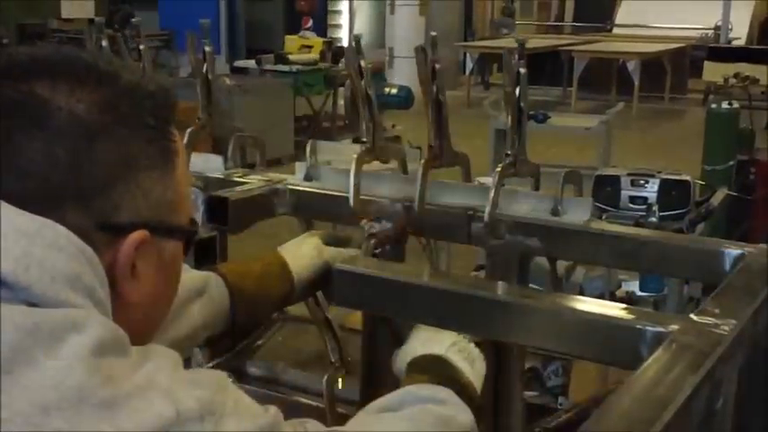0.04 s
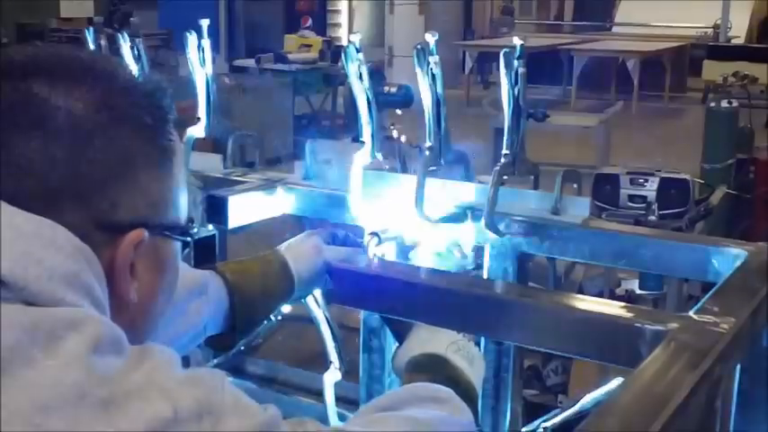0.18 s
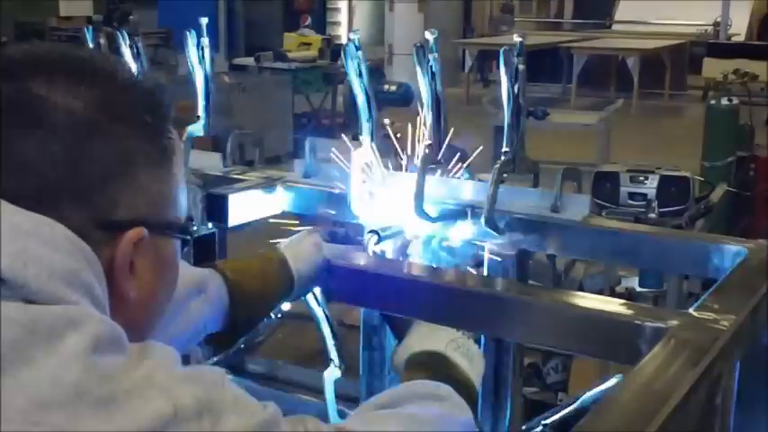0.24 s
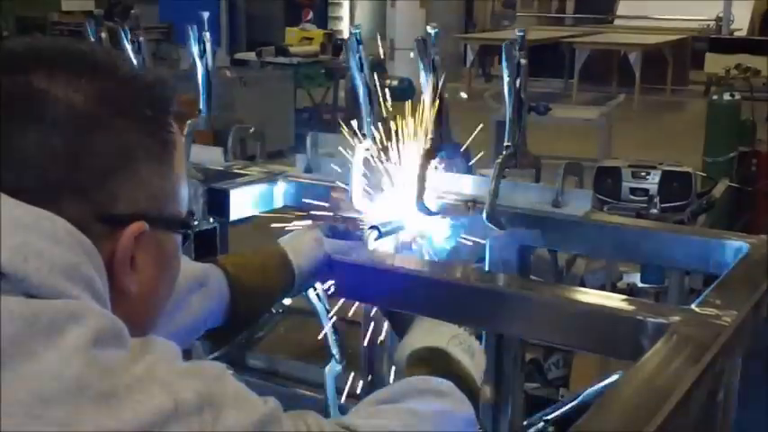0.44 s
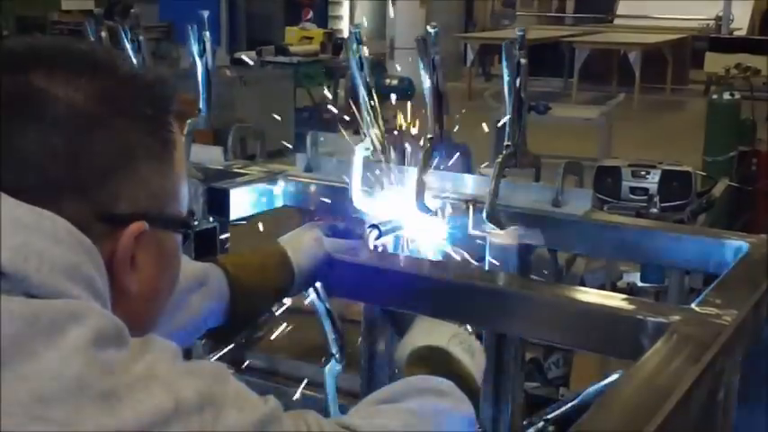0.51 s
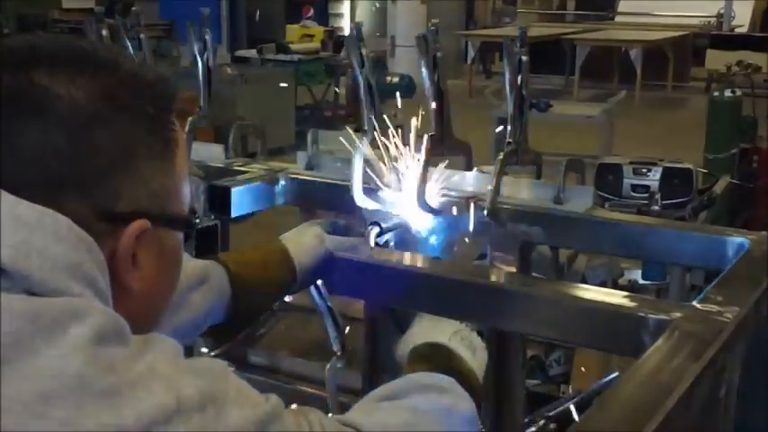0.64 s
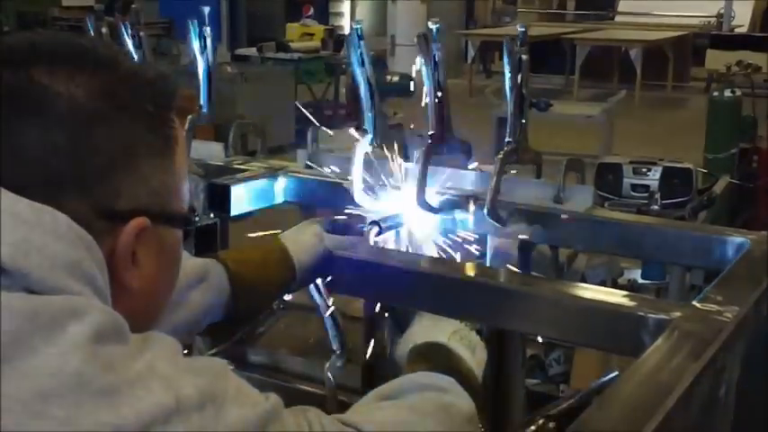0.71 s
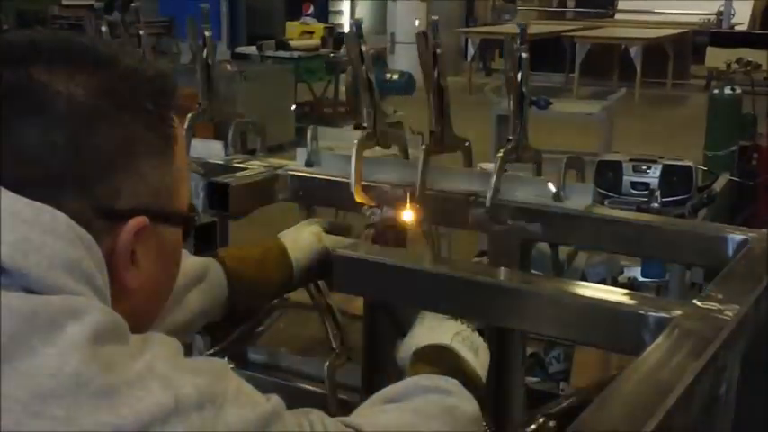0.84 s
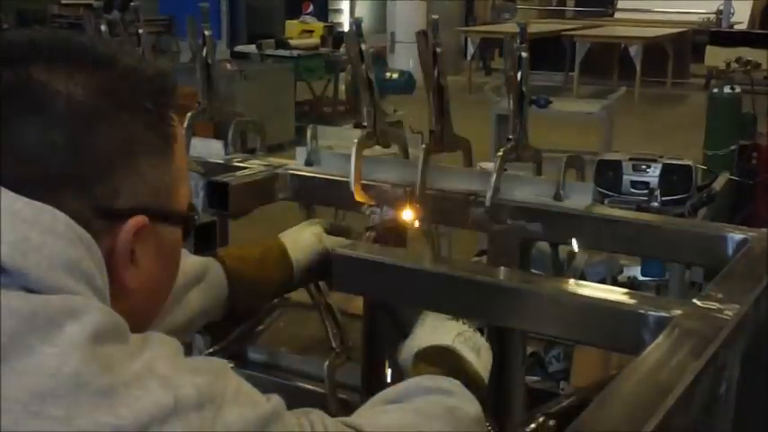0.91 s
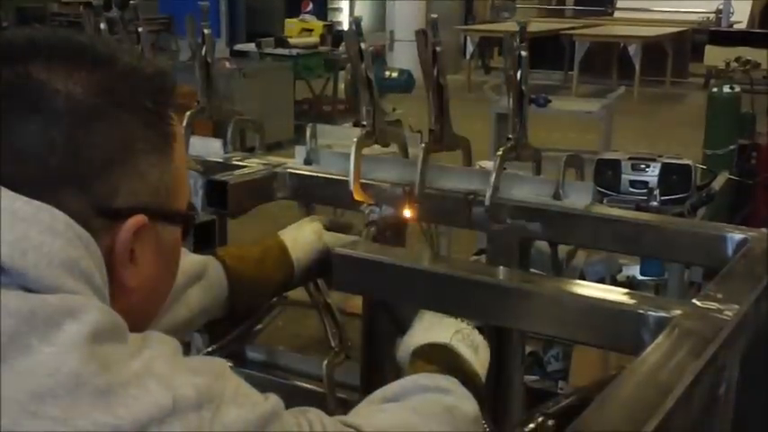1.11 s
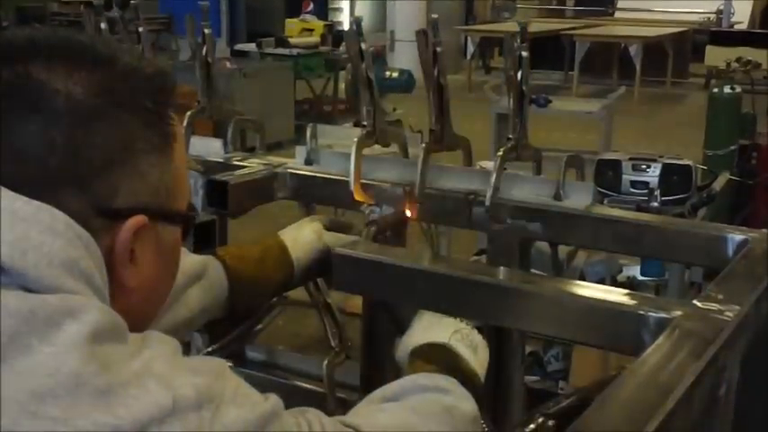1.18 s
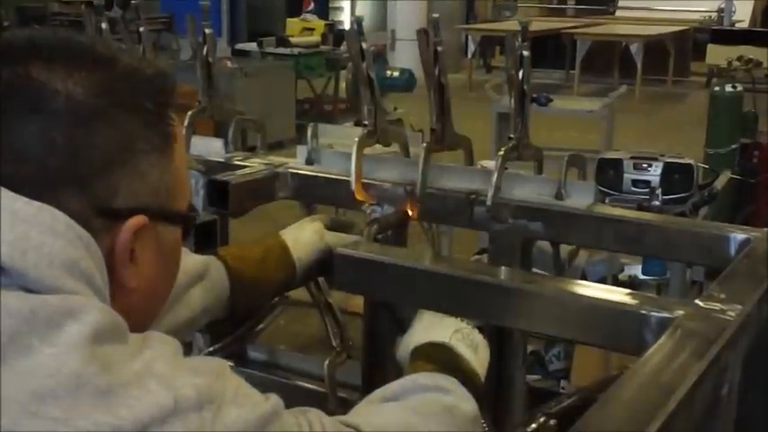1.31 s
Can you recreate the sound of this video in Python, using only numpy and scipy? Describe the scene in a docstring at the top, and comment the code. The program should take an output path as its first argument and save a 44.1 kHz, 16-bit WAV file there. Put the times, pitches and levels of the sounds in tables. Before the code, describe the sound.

Soft fan noise and faint hum in a workshop. At about 0.23 s a welding arc strikes with a snap and thump, sizzling weakly. Hard, uneven cracks follow from 0.37 to 0.41 s, then a brief gap. From 0.46 to 0.87 s pops come about a hundred per second, a bright gritty crackle with hiss, faint wavering tones and short steel ringing. It cuts off; fan noise remains until 1.35 s.

```python
"""Tack weld on a steel frame

A wire-feed welder lays one short tack in a workshop. The arc strikes, stutters, then crackles: each short
circuit of the wire ends in a sharp pop, a spike with scatter off the nearby steel, that rings the tubes
as decaying modes. Random spatter clicks and shaped noise (hiss, roar) fill the gaps, and two wavering
sines sing while the arc burns. Behind it lie fan noise and a transformer's hum, rising and falling in level."""
import sys
import numpy as np
from scipy import signal
from scipy.fft import rfft, irfft
from scipy.io import wavfile
from scipy.ndimage import uniform_filter1d

SR = 44100
rng = np.random.default_rng(int(sys.argv[2]) if len(sys.argv) > 2 else 0)


def wav_out(sig):
    """Save sig, one row per channel (or a flat mono array), as 16-bit PCM at SR to the path in sys.argv[1]."""
    wavfile.write(sys.argv[1], SR, np.round(np.clip(np.atleast_2d(sig).T, -1, 1) * 32767).astype(np.int16))


N = 59535  # length in samples

# spectrum shared by the cracks, the spatter and the hiss: frequency_hz, level_db (relative)
CRACK_SPECTRUM = [(300,-28),(1500,-8),(2100,-10.5),(2950,-4),(3200,7),(3800,-1),(4100,7),(4350,-5.5),(4600,6.5),(5050,1),(5350,6.5),(5750,3),(6300,8.5),(6780,0.5),(6980,13),(7400,13),(7700,-3),(8350,7.5),(8650,-1.5),(8900,7.5),(9600,2),(10100,8.5),(10500,3.5)]


def amp(db):
    """Amplitude ratio: 20 dB is a factor of ten."""
    return 10 ** (np.asarray(db) / 20)


def evened(x):
    """Power normalisation: scales to rms 1."""
    return x / np.sqrt(np.mean(x ** 2) + 1e-20)


def unit(x):
    """Energy normalisation: scales the sum of squares to 1."""
    return x / np.linalg.norm(x)


def read(points, hz):
    """Interpolation on a logarithmic frequency axis."""
    f, value = np.transpose(points)
    return np.interp(np.log(hz + 1), np.log(f + 1), value)


def level(points):
    """Envelope: gain over time, linear in decibels between (s, dB) points."""
    time_s = np.arange(N) / SR
    return amp(np.interp(time_s, *np.transpose(points)))


def add(mix, start_s, sound):
    """Superposition: adds a sound into the mix from its start time."""
    part = mix[round(start_s * SR):][:len(sound)]
    part += sound[:len(part)]


def through(x, response):
    """Linear filtering: convolves with an impulse response, keeping the length."""
    return signal.fftconvolve(x, response)[:len(x)]


def colour(points, size=4096):
    """Minimum phase: the Hilbert transform of log gain gives a causal response of that spectrum."""
    log_gain = np.log(amp(read(points, abs(np.fft.fftfreq(size, 1 / SR)))))
    spectrum = np.exp(np.conj(signal.hilbert(log_gain)))
    return np.fft.ifft(spectrum).real[:size // 2]


def noise(points):
    """Spectral shaping: filtered white noise of rms 1."""
    return evened(through(rng.standard_normal(N), colour(points)))


def flatten(x, size):
    """Spectral whitening: evens out a burst's broad spectrum, leaving its fine ripple."""
    spectrum = rfft(x, 2 * len(x))
    broad_power = uniform_filter1d(abs(spectrum) ** 2, size)
    return unit(irfft(spectrum / np.sqrt(broad_power + 1e-12))[:len(x)])


def tinted(x, spread_db, count=24):
    """Random equalisation: gives a burst its own broad colour, drawn at evenly spaced frequencies."""
    spectrum = rfft(x, 2 * len(x))
    place = np.linspace(0, count - 1, len(spectrum))
    tint = np.interp(place, np.arange(count), rng.standard_normal(count))
    return unit(irfft(spectrum * amp(spread_db * tint))[:len(x)])


def wander(size):
    """Low-pass random fluctuation: white noise averaged twice, then scaled to rms 1."""
    once = uniform_filter1d(rng.standard_normal(N), size)
    return evened(uniform_filter1d(once, size))


def machines():
    """Background sources: shaped fan noise and a hum of one fixed pitch, each rising and falling in level."""
    # fan spectrum: frequency_hz, level_db (per Hz, relative)
    fan_spectrum = [(20,-1.5),(50,-0.5),(120,-0.5),(160,-3),(240,0.5),(390,-3.5),(620,-1),(705,-4.5),(820,3.5),(930,-2.5),(1250,-3),(1650,-12),(2300,-15.5),(2800,-11),(3150,-19),(4000,-20),(6500,-31),(10500,-46.5)]
    # fan level: time_s, level_db (rms)
    fan_level = [(0,-40),(.15,-39.5),(.3,-35),(.6,-45.5),(.9,-42),(1.15,-41),(1.3,-37.5),(1.35,-38.5)]
    # transformer hum, louder as the arc first draws current: time_s, level_db (rms)
    hum_level = [(0,-53.5),(.22,-54.5),(.25,-43),(.34,-44),(.42,-61),(.9,-58.5),(1.35,-52)]
    hum_hz = 118.9
    hum = np.sqrt(2) * np.sin(2 * np.pi * (hum_hz * np.arange(N) / SR + rng.random()))
    return level(fan_level) * noise(fan_spectrum) + level(hum_level) * hum


def workshop(x):
    """Reverberation: quick reflections from bench and clamps, then a tail decaying by frequency."""
    # room decay: frequency_hz, t60_s
    room_decay = [(100,0.62),(1000,0.2),(4000,1),(10000,0.53)]
    bench_db, bench_decay_s, tail_db = -8.5, 0.0048, -15
    t = np.arange(SR) / SR
    reflections = rng.standard_normal(SR) * np.exp(-t / bench_decay_s) * (t > .002)
    bench = flatten(reflections[:SR // 20], size=60)
    late_noise = rng.standard_normal(SR) * (t > .009)
    hz, when_s, grid = signal.stft(late_noise, SR, nperseg=256)
    decay = amp(-60 * when_s / read(room_decay, hz)[:, None])
    tail = unit(signal.istft(grid * decay, SR, nperseg=256)[1])
    return x + amp(bench_db) * through(x, bench) + amp(tail_db) * through(x, tail)


def frame(drive):
    """Modal resonance: the arc excites the steel tubes, a sum of exponentially decaying sines."""
    # modes of the steel frame: frequency_hz, level_db (relative), t60_s
    modes = [(597,-18.5,0.12),(787.2,-5.5,0.1),(826.6,-2.5,0.077),(919,-10.5,.18),(1115,-13.5,0.22),(1226,-15,.18)]
    ring_db = -36
    t = np.arange(SR // 2) / SR
    ring = 0
    for hz, mode_db, t60_s in modes:
        ring = ring + amp(mode_db - 60 * t / t60_s) * np.sin(2 * np.pi * (hz * t + rng.random()))
    return amp(ring_db) * through(drive, ring)


def puffs():
    """Thermal expansion: suddenly heated gas sends out a soft pressure wave as the arc lights."""
    # gas puffs: start_s, level_db
    gas_puffs = [(0.2353,-24),(0.24,-44),(.4889,-26.5)]
    puff_s = 0.00089
    out = np.zeros(N)
    u = np.arange(SR // 20) / SR / puff_s  # time in puff lengths
    wave = -np.e * u * (2 - u) * np.exp(-u)  # one swing each way
    for start_s, level_db in gas_puffs:
        add(out, start_s, amp(level_db) * wave)
    return out


def singing():
    """Frequency and amplitude modulation: two wavering tones build up as the arc settles, and stop with it."""
    # tone levels: time_s, lower_tone_db (rms), upper_tone_db (rms), both before flutter
    tone_levels = np.array([(.2,-60,-70),(.29,-50,-64),(.34,-55,-60),(.40,-45,-54),(.44,-49,-60),(.475,-40,-56),(.56,-43.5,-56),(.68,-45,-58),(.73,-41,-42),(.79,-39,-44),(.82,-43,-50),(.865,-43,-54),(.90,-62,-68)])
    tones_hz, rise_hz_per_s, centre_s = (822, 928), 45, .65  # tones_hz holds at centre_s, before waver
    waver_hz, flutter_db = 9, 3  # both rms
    t = np.arange(N) / SR
    out = np.zeros(N)
    for k, hz in enumerate(tones_hz):
        pitch_hz = hz + rise_hz_per_s * (t - centre_s) + waver_hz * wander(size=400)
        loudness = level(tone_levels[:, [0, k + 1]]) * amp(flutter_db * wander(size=260))
        out += loudness * np.sin(2 * np.pi * np.cumsum(pitch_hz) / SR)
    return np.sqrt(2) * out


def burn():
    """Random impulses and turbulence: fine spatter, hiss and a low roar share the lit arc's envelope."""
    # level of the burning arc: time_s, level_db (added to the three levels below)
    arc_level = [(.228,-31),(.236,-8.5),(.30,-9.5),(.35,-12),(.37,2.5),(.42,-6.5),(.455,-40),(.47,7),(.51,-4),(.55,-3),(.66,-4.5),(.76,-1.5),(.80,0),(.865,0),(.88,-43)]
    # low roar: frequency_hz, level_db (per Hz, relative)
    roar_spectrum = [(30,-31),(100,-1),(170,-2.5),(280,2.5),(450,-7),(800,1),(1300,-4.5),(1700,-4),(2300,-15.5),(9000,-44)]
    spatter_per_s, spatter_spread_db = 150, 2
    spatter_db, hiss_db, roar_db = -45.5, -37, -38
    sizes = amp(spatter_spread_db * np.minimum(rng.exponential(1, N), 3.5))
    clicks = sizes * (rng.random(N) < spatter_per_s / SR)
    spatter = amp(spatter_db) * evened(through(clicks, colour(CRACK_SPECTRUM)))
    hiss = amp(hiss_db) * noise(CRACK_SPECTRUM)
    roar = amp(roar_db) * noise(roar_spectrum)
    return level(arc_level) * (spatter + hiss + roar)


def pops(size=512):
    """Impulse and scattering: each pop is a spike and its scatter; returns cracks and low bodies."""
    # pops of the arc: start_s, crack_db, body_db (each before its spectrum is applied)
    arc_pops = [(0.2329,-19.5,-27),(0.3707,-21.5,-37),(0.3766,-10,-12),(0.3865,-31,-49),(0.4003,-11,-21),(0.4103,-16.5,-23.5),
                (0.463,-22,-60),(0.4689,-22,-45),(0.4722,-19,-24),(0.4786,-21,-31.5),(0.4888,-20,-27.5),(.529,-12,-18),(0.5418,-18,-24),(0.5561,-16,-22.5),
                (0.5665,-25,-51),(0.5772,-29,-28.5),(.5855,-18,-27.5),(0.5953,-29,-38),(.6024,-23.5,-27.5),(.6117,-18,-28),(0.6271,-29.5,-29.5),
                (0.6364,-26,-26.5),(0.6502,-22,-34),(0.6611,-29,-30),(0.6753,-25,-41),(0.6857,-29,-33.5),(0.6949,-18.5,-28),(0.7002,-24,-37),
                (.7108,-20,-38),(.7207,-19,-28.5),(0.7319,-16,-40),(0.7436,-24,-33),(.7529,-24,-43),(0.768,-35,-35.5),(0.7767,-21.5,-30.5),
                (0.787,-24,-43),(0.8034,-24,-44),(0.8119,-26,-37),(.8219,-29,-50),(0.8347,-26,-31.5),(0.8447,-25,-31),(0.8535,-34,-38),(0.8602,-25,-39.5)]
    # low body of a pop: frequency_hz, level_db (relative)
    body_spectrum = [(30,-31),(100,-16.5),(180,-3.5),(290,2),(450,-4),(620,1),(850,4),(1100,2),(1650,-2.5),(2050,-13.5),(3500,-28),(9000,-42.5)]
    crack_scatter_s, crack_direct = 0.0013, 0.96  # scatter decay, spike against scatter of energy 1
    body_scatter_s, body_direct = 0.0011, 0.51
    alike = 0.35  # share of scatter power common to all pops
    pop_colour_db = 2.5  # how much the crack's colour differs from pop to pop
    t = np.arange(size) / SR
    cracks, bodies = np.zeros(N), np.zeros(N)
    common = rng.standard_normal(size)
    scale = np.sqrt(.002 * SR)  # energy of 2 ms at rms 1
    for start_s, crack_db, body_db in arc_pops:
        scatter = np.sqrt(alike) * common + np.sqrt(1 - alike) * rng.standard_normal(size)
        crack = crack_direct * (t == 0) + unit(scatter * np.exp(-t / crack_scatter_s))
        body = body_direct * (t == 0) + unit(scatter * np.exp(-t / body_scatter_s))
        crack = tinted(flatten(crack, size=10), pop_colour_db)
        add(cracks, start_s, amp(crack_db) * scale * crack)
        add(bodies, start_s, amp(body_db) * scale * flatten(body, size=3))
    cracks = through(cracks, unit(colour(CRACK_SPECTRUM)))
    return cracks, through(bodies, unit(colour(body_spectrum)))


def scene():
    """Superposition: the arc pops and sizzles, rings the frame and fills the workshop."""
    cracks, bodies = pops()
    arc = cracks + bodies + burn()
    drive_limit = 0.19  # the hardest pops shake the steel little more than the rest
    ring = frame(drive_limit * np.tanh(arc / drive_limit))
    reverberant = workshop(arc + ring + puffs())
    return (reverberant + singing() + machines())[None]


def record(dry):
    """Transduction: microphone colour, soft saturation of its signal, then a low-pass band limit."""
    # microphone colour: frequency_hz, level_db
    microphone = [(15,-31),(40,-6.5),(80,-0.5),(7100,0.5),(7700,-4.5),(7900,-15),(8120,-2),(8400,-0.5),(10500,2.5),(10900,-9.5),(11200,-29.5),(11600,-42)]
    overload, edge_hz = 1, 11900  # saturation amplitude, band edge
    heard = through(dry[0], colour(microphone))
    heard = heard / (1 + (heard / overload) ** 6) ** (1 / 6)
    low_pass = signal.firwin(255, edge_hz, window=("kaiser", 8), fs=SR)
    return signal.fftconvolve(heard, low_pass, "same")[None]


dry = scene()
out = record(dry)
wav_out(out)
```